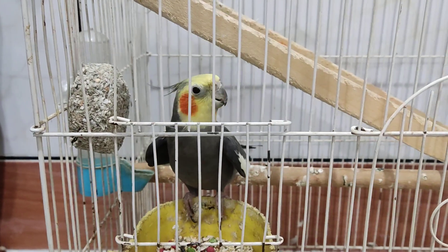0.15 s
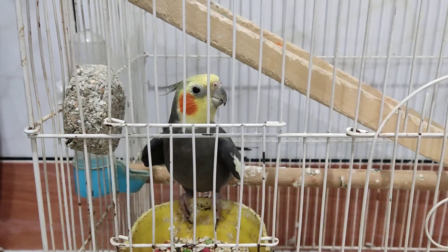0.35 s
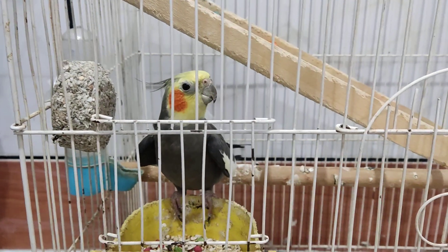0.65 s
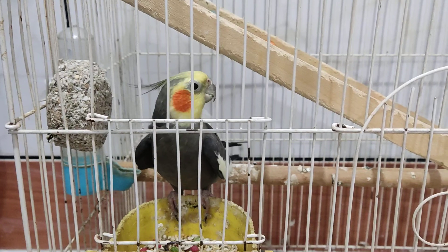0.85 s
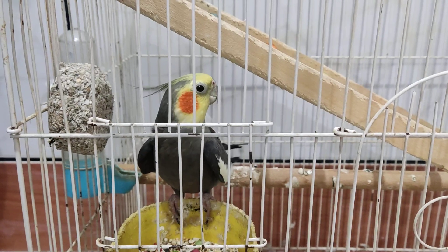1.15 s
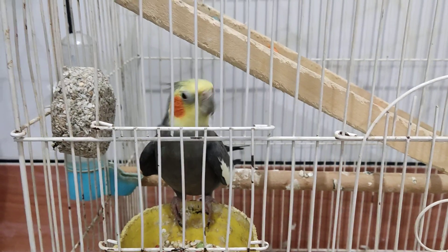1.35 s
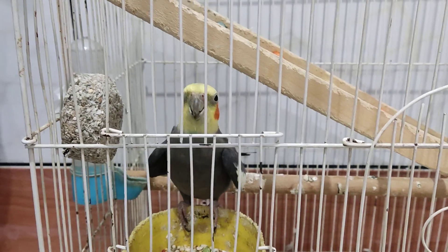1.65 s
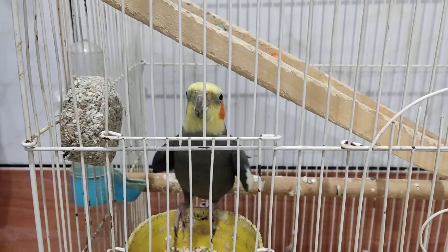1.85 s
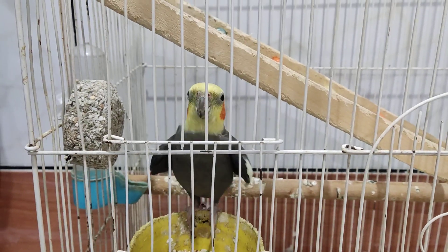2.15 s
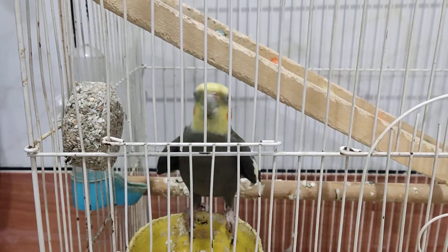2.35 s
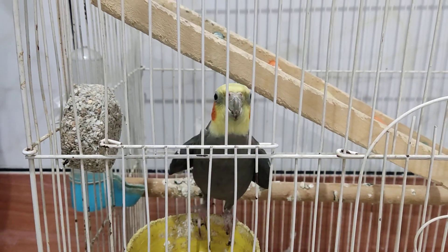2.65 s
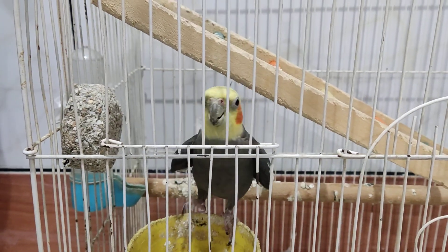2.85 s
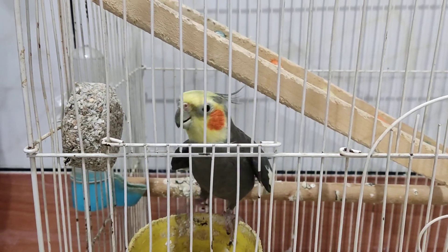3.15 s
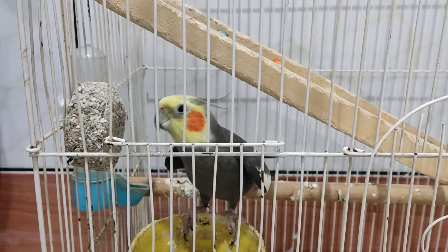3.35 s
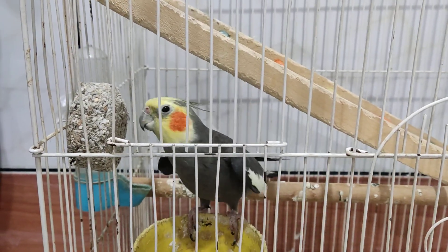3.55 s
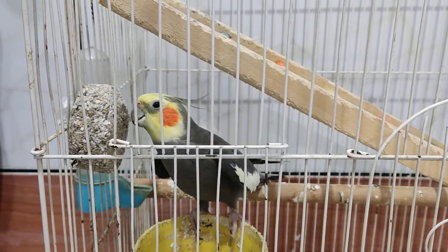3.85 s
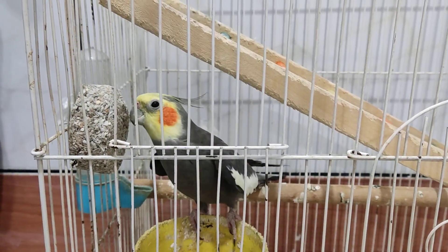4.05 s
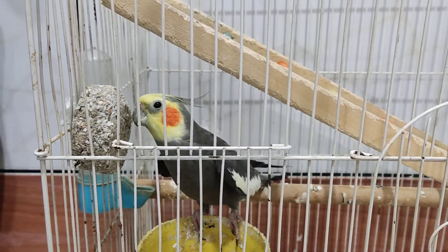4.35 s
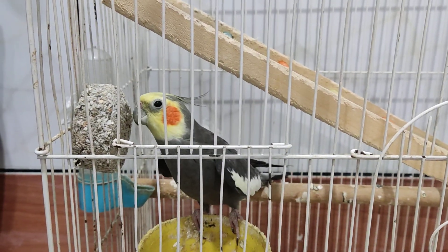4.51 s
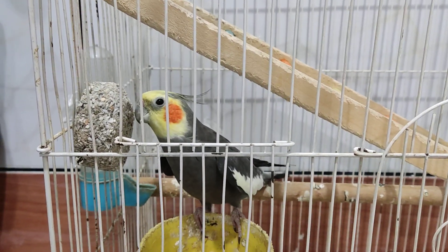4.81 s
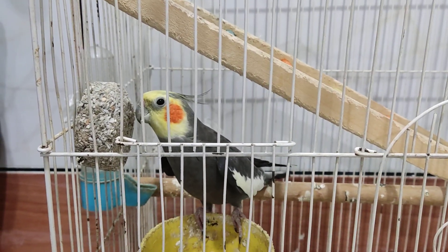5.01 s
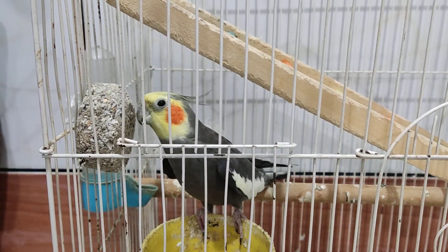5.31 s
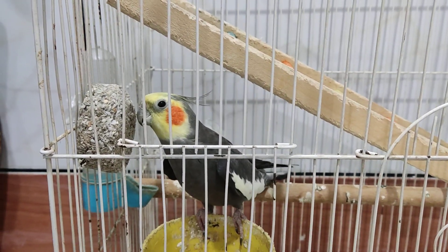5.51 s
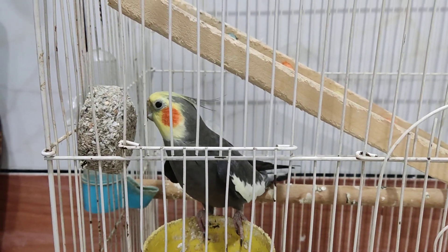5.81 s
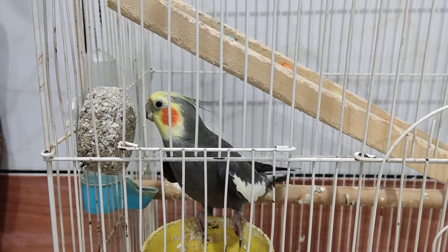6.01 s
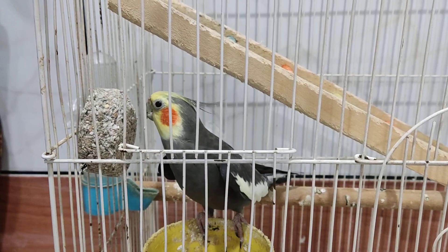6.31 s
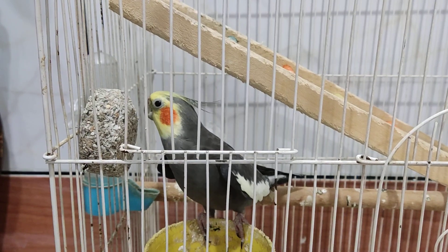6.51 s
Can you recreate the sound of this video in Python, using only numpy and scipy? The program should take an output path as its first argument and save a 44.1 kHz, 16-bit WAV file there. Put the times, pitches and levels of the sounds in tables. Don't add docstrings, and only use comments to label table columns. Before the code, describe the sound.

A cockatiel sings in a bare, reverberant room, close to a stereo microphone and stronger on the right, over faint hiss and low air rumble. An echo of an earlier pair lingers at the start; at 0.1 s a sharp whistle glides up, answered at 0.23 s by a falling one. The echo fades, with a slight rustle near 0.75 s and a dull perch knock at 1.1 s. From 1.4 to 3.65 s comes a brisk, regular phrase of rising and falling chirps, about seven notes a second, bright and reedy with breathy edges. A slower rise at 3.75 s ends in a soft puff near 4 s. Then quiet: a bar tick at 4.6 s, a very faint distant high whistle around 5 s, ticks at 5.2 s and light knocks at 5.8 s. From 6.0 s the alternating chirps return, somewhat softer, continuing to the end at about 6.6 s.

```python
import sys
import numpy as np
from scipy import signal
from scipy.fft import rfft, irfft
from scipy.io import wavfile
from scipy.ndimage import uniform_filter1d, minimum_filter1d

SR = 44100
rng = np.random.default_rng(int(sys.argv[2]) if len(sys.argv) > 2 else 0)


def field_ratio(decibels):
    return 10 ** (np.asarray(decibels, dtype=float) / 20)


def persist_wave(psi):
    counts = np.round(np.clip(psi, -1, 1) * 32767).astype(np.int16)
    wavfile.write(sys.argv[1], SR, np.atleast_2d(counts).T)


N = 294147
LEAD_S = 0.3
M = N + int(LEAD_S * SR)


def at_hz(points, hz):
    table_hz, values = np.transpose(points)
    return np.interp(np.log(np.maximum(hz, 1)), np.log(table_hz), values)


def in_time(rows, count=N):
    s, *columns = np.transpose(rows)
    t = (np.arange(count) - count + N) / SR
    return [np.interp(t, s, column) for column in columns]


def drift(rate_hz, count):
    r = np.exp(-2 * np.pi * rate_hz / SR)
    slow = signal.lfilter([1], [1, -2 * r, r * r], rng.standard_normal(count + SR))[SR:]
    return slow / slow.std()


def coloured(points, count, channels=1):
    hz = np.fft.rfftfreq(count, 1 / SR)
    shape = field_ratio(at_hz(points, hz)) * (hz >= points[0][0])
    x = irfft(rfft(rng.standard_normal((channels, count))) * shape, count)
    return x / x.std()


# pitch_hz, level_db (per Hz)
HISS_SPECTRUM = [(88, -28.5), (150, -4), (409, -5), (991, -11.5), (2140, -11), (3540, -12), (4600, -11),
                 (7500, -8.5), (10800, -10), (14200, -13), (15000, -35)]


def hiss():
    t = np.arange(N) / SR
    rustle_db = 3.5 * np.exp(-((t - 0.75) / 0.09) ** 2)
    level_db = -60.5 + rustle_db + 0.98 * drift(6, N)
    return field_ratio(level_db) * coloured(HISS_SPECTRUM, N, channels=2)


# pitch_hz, level_db (per Hz)
RUMBLE_SPECTRUM = [(1.8, -29.5), (3.0, 11), (16, -2.5), (80, -12), (136, -22.5), (200, -25), (260, -56.5),
                   (440, -120)]
# time_s, level_db
RUMBLE_LEVEL = [(0.0, -60.5), (2.47, -60.5), (2.82, -62), (5.57, -62.5), (6.67, -60.5)]


def rumble():
    shared = coloured(RUMBLE_SPECTRUM, N)
    own = coloured(RUMBLE_SPECTRUM, N, channels=2)
    level_db = in_time(RUMBLE_LEVEL)[0] + 9.0 + 2.0 * drift(3.5, N)
    return field_ratio(level_db) * (0.5 * shared + 0.51 * own)


def flicked(rows, pitch_ratio, level_db):
    s, hz, low_db, high_db = rows[-1]
    catch = (s + 0.0012, hz * 1.05, level_db + 4, level_db + 9.5)
    flick = (s + 0.0081, hz * pitch_ratio, level_db + 4.0, level_db)
    return list(rows) + [catch, flick]


def follow_db(strength_db):
    return 0.4 * (strength_db + 9)


# length_share, climb_share, fundamental_db, overtones_db (against the strength)
RISE_SHAPE = [(0, 0, -44, -39.5), (0.121, .11, -35.5, -33.5), (0.479, .38, -30, -21.5),
              (.7, .6, -24.5, -12.5), (.8, .75, -23, -6.5), (.9, 0.92, -15.5, -1), (1, 1, -17, -8)]


def rise(start_s, length_s, top_hz, strength_db, flick_db):
    bottom_hz = 1189
    rows = [(start_s + share * length_s, bottom_hz + climb * (top_hz - bottom_hz),
             low_db + follow_db(strength_db), high_db + strength_db)
            for share, climb, low_db, high_db in RISE_SHAPE]
    flick_ratio = 1.5 + 0.04 * (flick_db + 30)
    return flicked(rows, max(1.06, flick_ratio), flick_db)


# start_s, length_s, top_pitch_hz, strength_db, flick_db
RISING_NOTES = [(0.072, 0.095, 1945, -9.5, -24.5), (1.375, .082, 1964, -8.5, -33.5),
                (1.657, 0.084, 2158, -5, -29.5), (1.937, 0.08, 2179, -7.5, -27),
                (2.216, .078, 2169, -4.5, -28.5), (2.509, .079, 2066, -7.5, -27),
                (2.801, .085, 2122, -5, -30), (3.11, 0.093, 2080, -5.5, -36),
                (3.426, .108, 1976, -7.5, -25.5), (6.016, 0.081, 2084, -10.5, -44),
                (6.281, 0.075, 2150, -7.5, -35), (6.551, 0.074, 2142, -6.5, -42.5)]


def rising_notes():
    return [rise(*row) for row in RISING_NOTES]


def fall(shape, start_s, plunge_s, length_s, knee_hz, strength_db):
    return [(start_s + early * plunge_s + late * (length_s - plunge_s), ratio * knee_hz,
             low_db + follow_db(strength_db), high_db + strength_db)
            for early, late, ratio, low_db, high_db in shape]


# plunge_share, rest_share, knee_pitch_ratio, fundamental_db,
# overtones_db (against the strength)
LAST_FALL_SHAPE = [(0, 0.026, 1.6, -24.5, -23), (.22, 0.13, 1.5, -18, -6), (.45, 0.025, 1.31, -25.5, -3.5),
                   (.7, 0, 1.16, -23.5, -11), (1, 0.063, 1.0, -20.5, -4.5), (1, .2, .97, -19, -2),
                   (1, .65, .87, -23.5, -6.5), (1, 0.96, .68, -28.5, -24)]
# start_s, plunge_s, length_s, knee_pitch_hz, strength_db
LAST_FALLS = [
    (0.232, .026, .072, 1945, -10),
    (3.6, .037, 0.055, 1952, -12.5),
]


def last_falls():
    return [fall(LAST_FALL_SHAPE, *row) for row in LAST_FALLS]


def pair_before():
    pair = rising_notes()[0], last_falls()[0]
    return [np.array(rows) - [0.35, 0, 0, 0] for rows in pair]


# plunge_share, rest_share, knee_pitch_ratio, fundamental_db,
# overtones_db (against the strength)
FIRST_FALL_SHAPE = [(0, 0.0055, 1.38, -24.5, -32), (.5, 0.0079, 1.1, -26.5, -11),
                    (1, 0.037, 1.0, -15.5, -4.5), (1, .2, .945, -21.5, 0.5), (1, .58, .86, -21.5, -8),
                    (1, .8, .73, -31.5, -28.5), (1, 1, .6, -38.5, -30.5)]
# start_s, plunge_s, length_s, knee_pitch_hz, strength_db
FIRST_FALLS = [
    (1.511, 0.0079, 0.068, 2141, -3.5),
    (1.786, .016, 0.081, 2124, -5.5),
    (6.146, 0.01, .063, 2110, -11),
    (6.405, 0.015, 0.075, 2087, -9),
]


def first_falls():
    return [fall(FIRST_FALL_SHAPE, *row) for row in FIRST_FALLS]


# plunge_share, rest_share, knee_pitch_ratio, fundamental_db,
# overtones_db (against the strength)
FALL_SHAPE = [(0, 0.037, 1.44, -14, -27), (.3, 0.041, 1.3, -29, -23), (.78, 0.0023, 1.075, -23, -10),
              (1, 0.014, 1.0, -15.5, -0.5), (1, .14, .955, -28.5, -3.5), (1, .38, .91, -19.5, -2.5),
              (1, .6, .865, -21, -9), (1, .8, .74, -29, -23.5), (1, 1, .63, -36, -28.5)]
# start_s, plunge_s, length_s, knee_pitch_hz, strength_db
MIDDLE_FALLS = [(2.067, 0.02, 0.077, 2073, -6.5), (2.354, 0.019, .075, 2023, -8),
                (2.646, 0.018, 0.075, 2032, -8), (2.956, .018, 0.073, 2033, -6.5),
                (3.269, .022, .067, 2033, -7)]


def middle_falls():
    return [fall(FALL_SHAPE, *row) for row in MIDDLE_FALLS]


# time_s, pitch_hz, fundamental_db, overtones_db
LONG_RISE = [(3.757, 1250, -36.5, -45), (3.778, 1350, -38, -40.5), (3.814, 1486, -33.5, -30.5),
             (3.868, 1600, -29.5, -29.5), (3.895, 1740, -26.5, -16.5), (3.915, 1842, -17, -11),
             (3.937, 1873, -21.5, -19.5)]


def long_rise():
    return flicked(LONG_RISE, 1.6, -47)


# time_s, shadow_depth (0 to 1.5), extra_room_db (facing away), beak_gape_db (near 11 kHz)
HEAD_TURN = [(0.1, 0.84, 4.5, 13), (0.25, 0.48, 2, 12.5), (1.4, 0.66, -1.5, 2.5), (1.8, 0.72, -1.4, -2),
             (2.1, 0.71, 1, 2), (2.4, 0.7, -0.4, 2), (2.7, 0.75, 0.2, 4.5), (3.0, 0.69, -1.5, -0.5),
             (3.6, 0.9, 0.9, -0.5), (3.92, 0.88, 0.5, 0.5), (6.1, 0.93, 3.5, -10.5), (6.6, 0.72, 2.5, 2)]


def head_turn():
    return in_time(HEAD_TURN, count=M)


# pitch_hz, level_db (against the right port)
LEFT_SHADOW = [(1200, -4.5), (1900, -3), (2800, -9.5), (3800, -12), (5500, -22.5), (7500, -27), (8800, -31),
               (10000, 2), (14000, -9)]


def shadow_db(hz):
    return at_hz(LEFT_SHADOW, hz)


# pitch_hz, level_db
WINDPIPE = [(2400, -4), (3100, -4), (3900, -1), (4700, -2.5), (5600, -3.5), (6500, -13.5), (7600, -5),
            (8600, -17), (9400, -18), (10200, -22), (11200, -23), (12500, -38), (14000, -41),
            (15500, -56.5)]


def note(rows, depth, lag_ms, bright_db, chest_db, gape_db):
    s, *columns = np.transpose(rows)
    t = np.arange(s[0] - 0.002, s[-1] + 0.004, 1 / SR)
    count = len(t)
    start = round((t[0] + LEAD_S) * SR)
    at = np.minimum(start + np.arange(count), M - 1)
    pitch, low_db, high_db = [uniform_filter1d(np.interp(t, s, c), size=100) for c in columns]
    ragged = 0.04 * np.clip(pitch / 2200 - 1, 0, 0.3) / 0.3
    pitch = pitch * (1 + 0.006 * drift(180, count) + ragged * drift(900, count))
    edge = np.clip(np.minimum((t - t[0]) / 0.003, (t[-1] - t) / 0.012), 0, 1)

    order = np.arange(1, 11)[:, None]
    hz = order * pitch
    share = field_ratio(at_hz(WINDPIPE, hz)) * (hz < 16000)
    share = share * field_ratio(-9.0 * np.maximum(order - 2, 0) * np.maximum(pitch / 2150 - 1, 0) / 0.22)
    share = share / np.sqrt(np.sum(share[1:5] ** 2, axis=0)) * field_ratio(high_db)
    soft = 0.45 if columns[0][-1] > columns[0][0] else 0.1
    treble = np.clip((hz - 6000) / 2000, 0, 1)
    share = share * field_ratio(treble * (bright_db[at] + soft * (-3.0 - high_db)))
    patches_db = np.array([5 * drift(35, count) - 4 for _ in order])
    share = share * field_ratio(np.clip((hz - 8000) / 1500, 0, 1) * patches_db)
    share = share * field_ratio(np.exp(-((hz - 10900) / 1500) ** 2) * gape_db[at])
    share[0] = field_ratio(np.minimum(low_db, -17))
    shimmer_db = [2.5 * drift(120, count) + 1.5 * min(k - 1, 1) * drift(30, count) for k in order[:, 0]]
    share = share * field_ratio(shimmer_db) * np.sqrt(2) * edge

    phase = 2 * np.pi * np.cumsum(pitch) / SR
    right = np.sum(share * np.sin(order * phase), axis=0)
    late_phase = phase - 2 * np.pi * pitch * lag_ms[at] / 1000
    left_db = depth[at] * shadow_db(hz) + (order == 1) * chest_db[at]
    left = np.sum(share * field_ratio(left_db) * np.sin(order * late_phase), axis=0)

    breath = field_ratio(-31.0 + 0.13 * high_db + 3 * drift(50, count)) * edge
    breath = breath * min(1, 0.1 / (s[-1] - s[0])) ** 1.5
    return start, left, right, breath


# pitch_hz, level_db (per Hz)
BEAK_AIR = [(2500, -30), (5000, -14), (7000, -1), (8000, 0.5), (9000, -11), (11000, -1), (12500, -14.5),
            (14300, -15), (15000, -32.5)]


def beak_air(strength):
    return strength * coloured(BEAK_AIR, M)[0]


# pitch_hz, level_db (per Hz)
POP_AIR = [(1200, -28.5), (2000, -10), (3000, -8), (5000, 1.5), (8000, -7.5), (12000, -9), (14500, -25.5)]


def pops(hits):
    strength = signal.lfilter([1], [1, -np.exp(-1 / (0.007 * SR))], hits + 1e-18)
    return uniform_filter1d(strength, size=60) * coloured(POP_AIR, M)[0]


def thumps(hits):
    t = np.arange(900) / SR
    ring = np.sin(2 * np.pi * 830 * t) * t / 0.003 * np.exp(1 - t / 0.003)
    return signal.fftconvolve(hits, ring)[:M]


# pitch_hz, level_db (per Hz)
PUFF_AIR = [(500, -35.5), (900, -21.5), (1900, -18.5), (2800, -11), (3800, 2.5), (5500, -2), (7600, -8),
            (9500, -15.5), (11500, -8), (13000, -24.5), (14500, -34)]


def puff():
    start_s, attack_s, hold_s, release_s = 3.925, 0.025, 0.055, 0.011
    corners = start_s + LEAD_S + np.cumsum([0, attack_s, hold_s, release_s])
    shape_db = np.interp(np.arange(M) / SR, corners, [-25, 0, 0, -40], left=-99, right=-99)
    return field_ratio(-21.5 + shape_db + 2.5 * drift(400, M)) * coloured(PUFF_AIR, M)[0]


def song():
    depth, away_db, gape_db = head_turn()
    lag_ms = 0.057 + 0.14 * depth
    bright_db = -1.76 - 0.91 * away_db
    chest_db = -0.6 + 0.24 * away_db
    notes = pair_before() + rising_notes() + last_falls() + first_falls() + middle_falls() + [long_rise()]
    voice = np.zeros((2, M + SR))
    air, pop_hits, thump_hits = np.zeros((3, M + SR))
    for rows in notes:
        start, left, right, breath = note(rows, depth, lag_ms, bright_db, chest_db, gape_db)
        end = start + len(left)
        voice[:, start:end] += [left, right]
        air[start:end] += breath
        if rows[-1][1] > rows[0][1]:
            top, bottom, pop_db, thump_db = end - 500, start + 60, -30.0, -52.0
        else:
            top, bottom, pop_db, thump_db = start + 60, end - 250, -32.0, -54.0
        pop_hits[top] += field_ratio(pop_db)
        thump_hits[bottom] += field_ratio(thump_db + 3 * rng.standard_normal())
    wind = beak_air(air[:M]) + puff() + pops(pop_hits[:M]) + thumps(thump_hits)
    shade = field_ratio(shadow_db(np.fft.rfftfreq(M, 1 / SR)))
    left_wind = irfft(rfft(np.roll(wind, shift=6)) * shade, M)
    return voice[:, :M] + [left_wind, wind]


# pitch_hz, fade_s
ROOM_FADE = [(1000, 0.51), (2000, 0.61), (4000, 0.52), (8000, 0.48), (14000, 0.37)]
# pitch_hz, level_db
ROOM_COLOUR = [(900, -2.5), (1900, -3.5), (3800, -6.5), (5600, -7.5), (7600, -7.5), (11000, -8),
               (15000, -11)]


def room(x):
    t = np.arange(SR) / SR
    edges_hz = 250 * 2 ** np.arange(0, 6.1, 0.5)
    white = rng.standard_normal((2, SR))
    tail = 0
    for low, high in zip(edges_hz, edges_hz[1:]):
        hz = np.sqrt(low * high)
        band = signal.sosfilt(signal.butter(2, [low, high], "band", fs=SR, output="sos"), white)
        fade_s = at_hz(ROOM_FADE, hz)
        level_db = at_hz(ROOM_COLOUR, hz) - 60 * t / fade_s
        tail = tail + band * field_ratio(level_db) / np.sqrt(fade_s * SR / 14)
    build_up = np.clip((t - 0.002) / 0.00087, 0, 1)
    near_walls = 1 + 0.58 * np.exp(-t / 0.01)
    return signal.fftconvolve(x[None], tail * build_up * near_walls, axes=1)[:, :M]


# time_s, peak_db, ring_hz
TICKS = [
    (0.687, -66, 614),
    (1.105, -51, 414),
    (4.581, -48, 1220),
    (5.198, -52.5, 1500),
    (5.255, -55, 633),
    (5.256, -56, 2205),
    (5.799, -61.5, 391),
    (5.822, -53.5, 502),
    (5.856, -58.5, 750),
]


def ticks():
    out = np.zeros(M)
    t = np.arange(1500) / SR
    cracks = signal.lfilter([0.35], [1, -0.65], rng.standard_normal((len(TICKS), 1500)))
    for (s, peak_db, hz), crack in zip(TICKS, cracks):
        at = round((s + LEAD_S) * SR)
        ring = np.sin(2 * np.pi * hz * t)
        out[at:at + 1500] += field_ratio(peak_db + 4) * (ring + 0.6 * crack) * np.exp(-t / 0.002)
    return out


def far_bird():
    middle_s, half_s, top_hz, sag_hz = 5.02, 0.23, 4340, 430
    off = (np.arange(N) / SR - middle_s) / half_s
    pitch = top_hz - sag_hz * np.minimum(off ** 2, 2)
    level_db = -74.2 - 9 * np.minimum(off ** 4, 9)
    ports = []
    for _ in range(2):
        loudness = field_ratio(level_db + 5.4 * drift(40, N))
        wavering = pitch * (1 + 0.009 * drift(70, N))
        ports.append(loudness * np.sin(2 * np.pi * np.cumsum(wavering) / SR))
    return np.array(ports)


def scene():
    bird, tick = song(), ticks()
    away_db = head_turn()[1]
    near = bird + tick + room(bird[1] * field_ratio(away_db) + tick)
    return near[:, M - N:] + hiss() + rumble() + far_bird()


def top_cut(x):
    return signal.sosfilt(signal.butter(12, 15550, fs=SR, output="sos"), x)


def record(dry):
    ceiling = 0.88
    over = -minimum_filter1d(-np.abs(dry).max(axis=0), size=200) / ceiling
    held = dry / uniform_filter1d(np.maximum(over, 1), size=120)
    cut = signal.sosfilt(signal.cheby2(10, 30, 14750, fs=SR, output="sos"), held)
    return top_cut(cut)


dry = scene()
out = record(dry)
persist_wave(out)
```